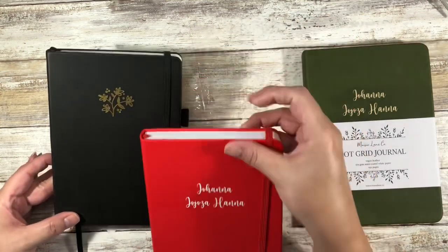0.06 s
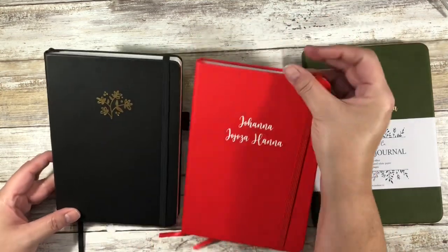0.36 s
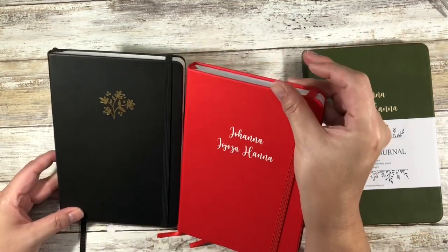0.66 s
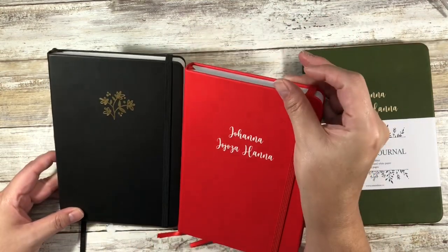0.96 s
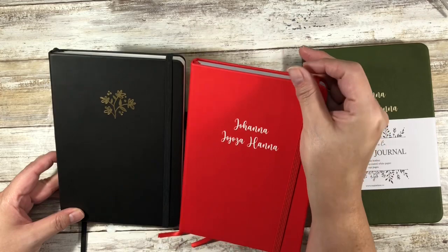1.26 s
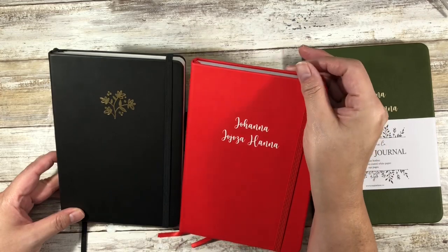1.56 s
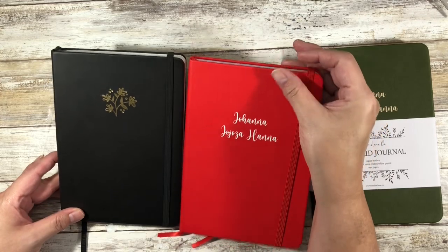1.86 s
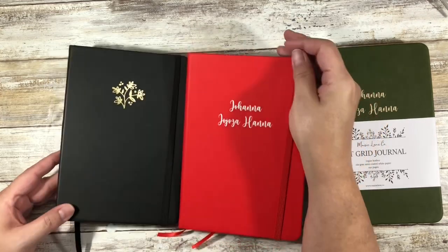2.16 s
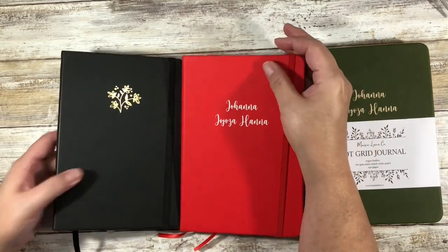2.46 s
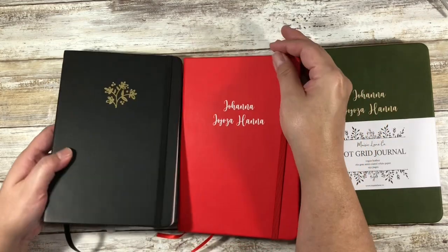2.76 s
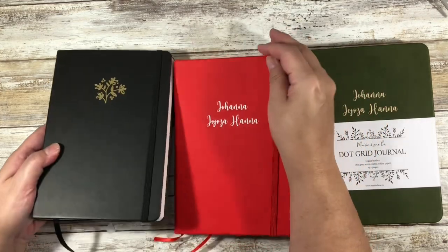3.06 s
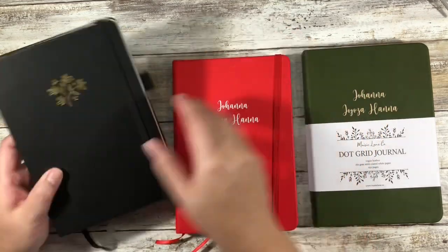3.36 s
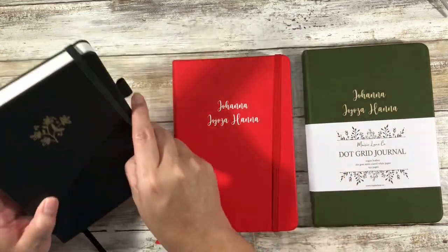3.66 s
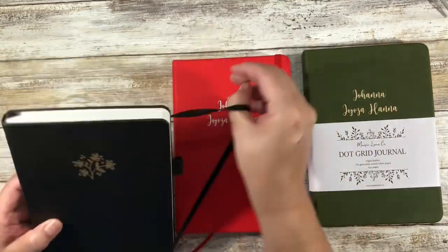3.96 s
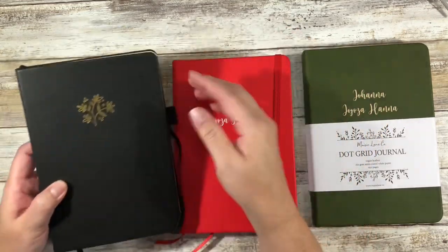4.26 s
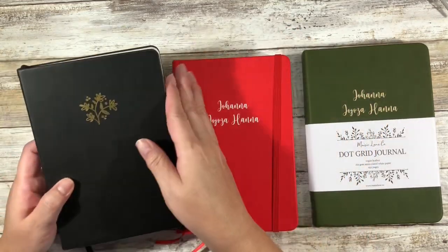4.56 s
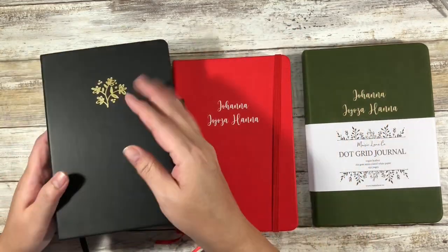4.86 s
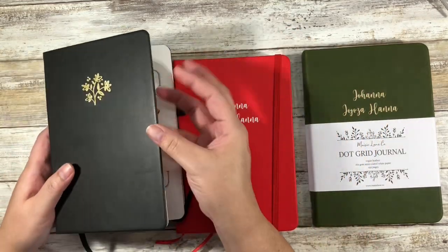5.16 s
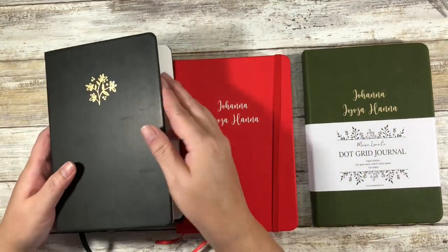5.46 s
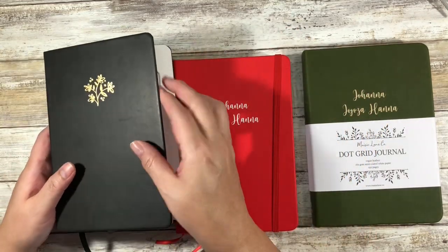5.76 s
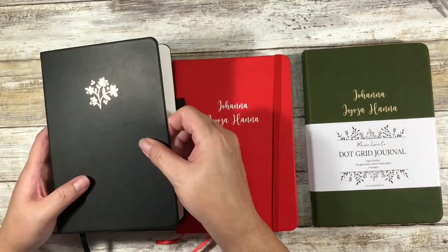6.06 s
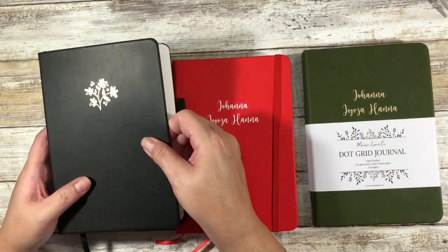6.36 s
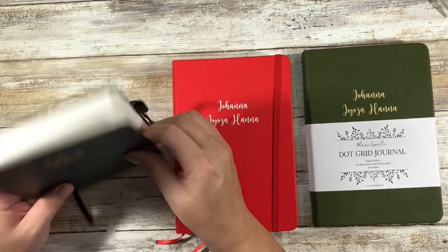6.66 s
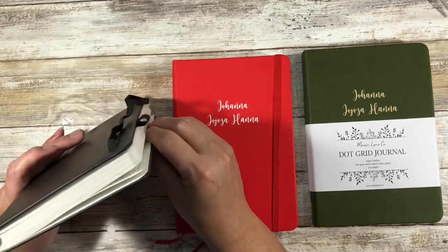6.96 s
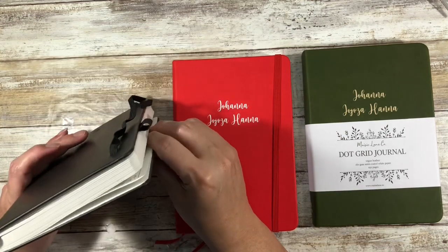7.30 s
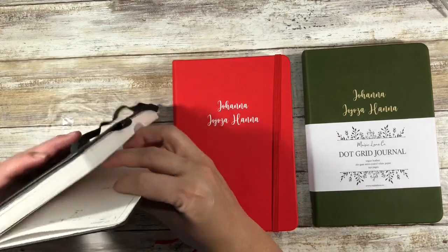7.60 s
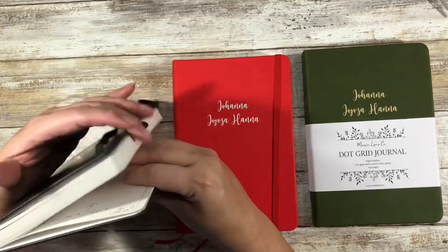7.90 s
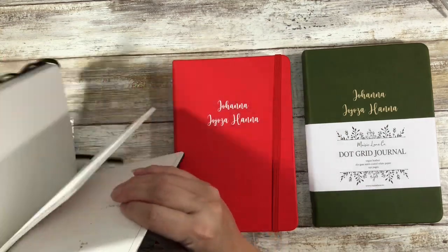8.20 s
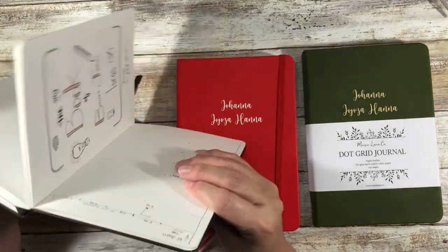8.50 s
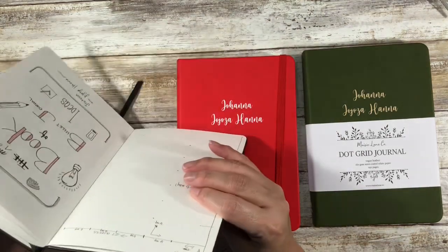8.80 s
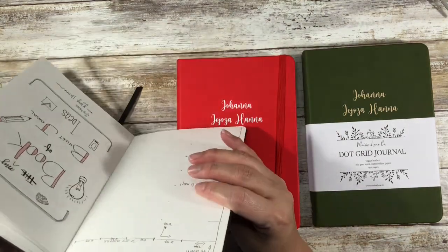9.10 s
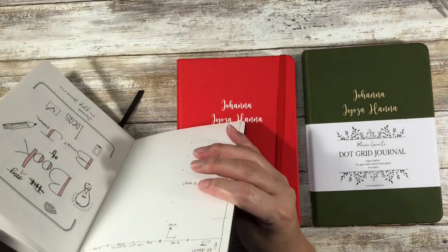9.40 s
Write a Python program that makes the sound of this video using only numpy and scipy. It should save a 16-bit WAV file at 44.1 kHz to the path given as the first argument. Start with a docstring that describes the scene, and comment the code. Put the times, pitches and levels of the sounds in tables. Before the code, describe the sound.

Hardcover notebooks are set down and nudged across a wooden table with light knocks and soft scuffs. One is lifted with a dull thump, and its elastic band comes off with a sharp snap. Fingers rub and tap the cover, then pages rustle and the book opens with a few clacks. A single microphone picks it up in a small quiet room with a faint hum.

```python
"""Light knocks and scuffs as hardcover notebooks are nudged across a wooden table; one is lifted, its
elastic snaps off, and it is opened. Knocks travel as bending waves (treble first, bass a few ms later)
and ring the table; covers, fingers and pages rub in fine stick-slip grains.
A small quiet room with a faint hum surrounds the single microphone."""
import sys
import numpy as np
from scipy import signal
from scipy.fft import rfft, irfft, next_fast_len
from scipy.io import wavfile
from scipy.ndimage import map_coordinates

SR = 44100
rng = np.random.default_rng(int(sys.argv[2]) if len(sys.argv) > 2 else 0)


def output_pcm(signal):
    """Save a mono or channel-first signal as 16-bit PCM at the path in sys.argv[1].

    Samples are clipped to [-1, 1] before scaling.
    """
    pcm = np.clip(np.atleast_2d(signal).T, -1, 1) * 32767
    wavfile.write(sys.argv[1], SR, np.round(pcm).astype(np.int16))


N = 420713


def undb(db):
    """Decibels to gain."""
    return 10 ** (np.asarray(db) / 20)


def unit(x):
    """Scale to rms 1."""
    return x / np.sqrt(np.mean(x ** 2) + 1e-18)


def band_unit(x, lo_hz, hi_hz):
    """Scale x so that its share within a band has rms 1."""
    band = signal.butter(4, [lo_hz, hi_hz], "band", fs=SR, output="sos")
    return x / np.std(signal.sosfilt(band, x))


def clock(seconds):
    """Sample times of a short sound."""
    return np.arange(max(int(seconds * SR), 16)) / SR


def add(out, start, x):
    """Mix x into out from a start in seconds."""
    i = int(np.clip(start * SR, 0, N - 1))
    out[i:i + len(x)] += x[:N - i]


def resonate(x, hz, width_hz):
    """Two-pole resonance with gain 1 at its centre."""
    w = 2 * np.pi * min(hz, .45 * SR) / SR
    a = np.sin(w) * width_hz / hz / 2
    return signal.lfilter([a, 0, -a], [1 + a, -2 * np.cos(w), 1 - a], x)


def colour(x, points):
    """Equalise x along a curve of (Hz, dB) points."""
    size = next_fast_len(N)
    hz, db = np.transpose(points)
    f = np.maximum(np.fft.rfftfreq(size, 1 / SR), 1)
    gain = undb(np.interp(np.log(f), np.log(hz), db))
    return irfft(rfft(x, size) * gain, size)[:N]


def wander(rate):
    """Glide through `rate` random values a second, with a spread near 1."""
    steps = rng.standard_normal(N // 10)
    return np.interp(np.arange(N) / SR * rate, np.arange(len(steps)), steps)


def room_tone(hum_hz=120.6, hum_db=-57, hum_waver=0.72):
    """A bed of low room air and microphone hiss, with a wavering mains hum."""
    # Spectrum of the air and hiss. Each row: frequency in Hz, density in dB per Hz.
    air_curve = [(15, -110), (35, -85), (55, -75), (90, -72.5), (140, -80.5), (270, -78), (400, -83.5),
                 (500, -90.5), (640, -88), (800, -93), (1500, -100), (3000, -104), (7000, -109),
                 (15000, -112)]
    air = colour(rng.standard_normal(N) * np.sqrt(SR / 2), air_curve)
    waver = 1 + hum_waver * (wander(28) + 1j * wander(33))  # in level and phase
    hum = np.real(waver * np.exp(2j * np.pi * hum_hz * np.arange(N) / SR))
    return air + undb(hum_db) * unit(hum)


def room_reverb(x, split_hz=1500, build_s=0.0016):
    """The small room answers with a short diffuse tail whose treble dies sooner."""
    t = clock(.5)
    noise = rng.standard_normal(len(t)) * (1 - np.exp(-(t / build_s) ** 2))
    tail = 0
    for side, db, t60_s in ("low", -10.5, 0.18), ("high", -13, 0.16):
        band = signal.sosfilt(signal.butter(1, split_hz, side, fs=SR, output="sos"), noise)
        fade = np.exp(-np.log(1000) * t / t60_s)
        tail = tail + undb(db) * band * fade / np.linalg.norm(fade)
    return signal.fftconvolve(x, tail)[:N]


def table_ring(hits, ring_db=-50.5):
    """The table top and the covers lying on it ring on after every hit."""
    # Their modes. Each row: frequency in Hz, relative level in dB, time to fall 60 dB in seconds.
    modes = [(65.4, 2, 0.19), (116.1, 6, 0.28), (186, -17, 0.35), (272, -0.5, 0.057), (325, -12, 0.058),
             (398, 3, 0.053), (496, -13, 0.26), (620, -31, .1), (872, 1, 0.045), (940, -16, 0.07),
             (1200, -4, 0.045), (1570, -6, 0.14)]
    t = clock(0.38)
    ring = sum(undb(db) * np.cos(2 * np.pi * hz * t) * np.exp(-np.log(1000) * t / t60_s)
               for hz, db, t60_s in modes)
    return undb(ring_db) * signal.fftconvolve(hits, ring)[:N]


def paper_ring(x):
    """Stiff covers and paper add narrow treble resonances to ticks and rubbing."""
    # Those resonances. Each row: centre in Hz, width in Hz, gain in dB.
    sheet_modes = [(3895, 250, -10.5), (6250, 110, -30.5), (7550, 140, -12.5), (7870, 130, -11),
                   (13000, 93, 2), (13500, 180, -12)]
    return sum(undb(db) * resonate(x, hz, width_hz) for hz, width_hz, db in sheet_modes)


def hand_reflections(x, gaps_ms=(.55, 1.3, 2.9), drift=0.13, bounce=.2):
    """Reflections between the moving hands and the covers cut wandering peaks and dips."""
    lags = (gap * SR / 1000 * (1 + drift * wander(4)) for gap in gaps_ms)
    echoes = sum(map_coordinates(x, [np.arange(N) - lag], order=3) for lag in lags)
    return (x - bounce * echoes) / np.sqrt(1 + len(gaps_ms) * bounce ** 2)


def friction(rate, patchy_db):
    """Tiny slips of uneven size, about `rate` a second, bunched as the grip comes and goes."""
    slips = (rng.random(N) < rate / SR) * rng.standard_normal(N)
    return unit(slips * undb(patchy_db * wander(120)))


def slides(attack_s=0.027, release_s=0.012, scrape_trim_db=-1, hiss_trim_db=-0.5, grip_db=1):
    """Board scrapes on wood grain, smooth covers and paper hiss, and catching fibres crackle."""
    # A cover, palm or page slides. Each row: start and length in seconds, scrape level (2.3-6 kHz)
    # and hiss level (7-15.5 kHz) in dB before the trims, swell from start to end in dB.
    moves = [(0.023, 0.14, -65, -62, -10), (0.173, 0.29, -60, -60.5, -13), (.72, 0.15, -74, -69.5, -10),
             (1.142, 0.16, -78, -73, 7), (1.602, 0.31, -69, -67.5, -1), (1.862, 0.34, -55, -61, -5),
             (2.204, 0.209, -62, -56.5, -2), (2.414, 0.17, -58.5, -58.5, -8),
             (2.57, 0.084, -58.5, -53.5, 2), (2.655, .18, -58, -60, -5.5), (2.86, .3, -56.5, -58.5, 16.5),
             (3.147, 0.32, -66.5, -67.5, -1), (3.496, 0.058, -55, -64.5, 6), (3.55, 0.18, -71, -68, 7),
             (3.682, 0.024, -55.5, -63, 0), (3.736, 0.11, -53.5, -51, -10), (4.077, 0.036, -63, -51.5, 6),
             (4.122, 0.035, -57.5, -65, -1), (4.322, 0.027, -47, -46.5, -5), (4.586, 0.15, -62.5, -68, 12),
             (4.74, 0.37, -62, -64.5, 6), (5.045, 0.046, -51.5, -58, 11), (5.117, 0.091, -52, -48, 1.5),
             (5.189, 0.23, -70.5, -65.5, -3), (5.657, 0.1, -63, -71, 1), (5.798, 0.11, -59.5, -57.5, -3),
             (5.92, 0.35, -67, -72, -17), (6.322, 0.26, -65, -65, 4), (6.57, 0.2, -67, -65.5, 2),
             (7.275, 0.1, -56.5, -57, 10), (7.397, 0.15, -55, -53.5, -6), (7.546, 0.19, -57.5, -63.5, -12),
             (7.742, 0.13, -58.5, -54, -11), (7.883, 0.064, -61, -72, 6), (7.955, 0.28, -54.5, -54.5, 0),
             (8.227, 0.18, -57.5, -57, 2), (8.383, 0.13, -59, -63, -11), (8.974, 0.29, -68, -89, -5)]
    # Tone of the rough scrape. Each row: frequency in Hz, relative level in dB.
    scrape_curve = [(150, 7.5), (400, 9.5), (900, 9), (1800, 8), (3000, 6.5), (4500, 5), (6500, -1.5),
                    (10000, -34), (16000, -34)]
    # Tone of the smooth hiss. Each row: frequency in Hz, relative level in dB.
    hiss_curve = [(2000, -24), (4500, -2), (7000, 2), (9000, 2.5), (11500, 0.5), (14000, 1), (16000, 4)]
    scrape_gain, hiss_gain = np.zeros(N), np.zeros(N)
    for start, length, scrape_db, hiss_db, swell_db in moves:
        t = clock(length + 10 * release_s)
        attack = np.minimum(t / attack_s, 1)
        swell = undb(swell_db * (np.minimum(t / length, 1) - .5))
        release = np.exp(-np.maximum(t - length, 0) / release_s)
        motion = attack * swell * release
        add(scrape_gain, start, undb(scrape_db + scrape_trim_db) * motion)
        add(hiss_gain, start, undb(hiss_db + hiss_trim_db) * motion)
    crackle = undb(-14) * friction(rate=120, patchy_db=5)
    scrape = colour(friction(rate=9000, patchy_db=3.5) + crackle, scrape_curve)
    hiss = colour(friction(rate=25000, patchy_db=1.2) + crackle, hiss_curve)
    grip = undb(grip_db * wander(30))
    return grip * (scrape_gain * band_unit(scrape, 2300, 6000) + hiss_gain * band_unit(hiss, 7000, 15500))


def strokes(fade_share=0.46, widen=1.15, sag_octaves_per_s=0.399):
    """Stick-slip grains ring the cover; each stroke swells, sags in pitch as it slows, and lets go."""
    # Skin or board catches and slips. Each row: start and length in seconds, level in dB,
    # resonance in Hz, its width in Hz before widening.
    rubs = [(0.24, 0.039, -55, 2270, 900), (1.883, .28, -58.5, 2930, 170), (1.909, 0.35, -60, 890, 990),
            (2.237, 0.097, -57, 4150, 1700), (2.501, 0.089, -48.5, 830, 447),
            (2.603, 0.076, -56.5, 900, 700), (2.675, 0.084, -51.5, 1140, 610),
            (2.748, .125, -57, 1470, 400), (2.886, 0.25, -52.5, 590, 900), (3.098, 0.037, -46, 1390, 450),
            (3.504, .064, -46.5, 404, 450), (3.755, 0.071, -49.5, 724, 900), (3.853, 0.026, -31, 770, 403),
            (4.628, 0.16, -54.5, 1230, 1000), (5.046, .044, -41, 1270, 382),
            (5.071, 0.032, -49, 2440, 1100), (5.191, 0.013, -42, 1560, 1300),
            (5.196, 0.023, -46.5, 7000, 1500), (5.769, 0.2, -57.5, 1690, 1400),
            (5.941, 0.092, -49.5, 1690, 600), (5.979, 0.089, -49.5, 1210, 890),
            (6.08, 0.146, -46.5, 1360, 980), (6.216, 0.026, -49.5, 1200, 704),
            (6.328, 0.16, -50, 1410, 735), (6.415, 0.13, -53.5, 2530, 500), (6.46, 0.18, -58, 1350, 1100),
            (7.288, 0.11, -56, 2130, 400), (7.57, 0.026, -36.5, 1500, 387), (7.571, 0.029, -46.5, 735, 600),
            (7.715, 0.057, -51, 1730, 450), (7.759, 0.1, -56, 1810, 1200), (8.113, 0.033, -47, 1720, 1400),
            (8.189, 0.024, -51, 1260, 1200)]
    out, slips = np.zeros(N), friction(rate=3500, patchy_db=2.5)
    for start, length, db, hz, width_hz in rubs:
        t = clock(length)
        grains = slips[int(start * SR):][:len(t)]
        ring = resonate(resonate(grains, hz, widen * width_hz), hz, widen * width_hz)
        speed = 2 ** (sag_octaves_per_s * (length / 2 - t))
        sagging = map_coordinates(ring, [np.cumsum(speed)], order=3)
        fades = signal.windows.tukey(len(sagging), fade_share)
        add(out, start, undb(db) * unit(sagging * fades))
    return out


def ticks(crest_db=6):
    """Elastic, nails and paper crack in bright bursts of noise that die within milliseconds."""
    # The cracks. Each row: start in seconds, nominal peak in dB (crest_db above the opening rms),
    # centre in Hz, decay in ms.
    cracks = [(.0224, -46, 3000, 5.9), (0.1894, -40.5, 3370, 4.3), (1.895, -33.5, 3500, 5.3),
              (3.077, -26, 5300, 2.3), (3.1263, -31.5, 6860, 3.3), (3.406, -45, 3500, 1.5),
              (3.7474, -28.5, 9000, 2.9), (3.7615, -31, 5000, 3.2), (3.803, -42, 3000, 3.5),
              (3.8541, -10, 12300, 2.9), (3.858, -21, 13400, 1.6), (3.8603, -12, 6500, 4.1),
              (3.868, -36, 4900, 26), (4.816, -41, 5000, 2.5), (4.8636, -40.5, 8000, 2),
              (5.0078, -35, 9000, 1.4), (6.596, -46.5, 4000, 8.6), (6.968, -44, 5150, 4),
              (7.3647, -34.5, 9000, 2.4), (7.6792, -37, 7000, 2.5), (8.068, -22, 9900, 0.51),
              (8.0714, -23.5, 8540, 1.1), (8.1134, -34, 6000, 1.5), (8.125, -21, 3880, 1.6),
              (8.174, -22.5, 5270, 1.6), (8.266, -36, 4000, 3), (8.3064, -41, 5000, 2.2),
              (8.6076, -26.5, 7500, 1), (8.807, -47, 7220, 2), (8.8878, -43, 3870, 2.6)]
    out, t = np.zeros(N), clock(.1)
    for start, db, hz, decay_ms in cracks:
        burst = unit(resonate(rng.standard_normal(len(t)), hz, width_hz=hz))
        fade = np.exp(-1000 * t / decay_ms)
        add(out, start, undb(db - crest_db) * burst * fade)
    return out


def thuds(lead_s=.02, echo_s=0.0154, echo_db=-15):
    """One swing of pressure as a broad face lands, thrown back once by a wall."""
    # The flat of a book or hand lands. Each row: time in seconds, peak in dB, pitch in Hz.
    landings = [(0.041, -40.5, 90), (0.078, -39, 90), (2.165, -45, 59.5), (3.143, -19, 84),
                (3.872, -37.5, 104), (4.898, -38.5, 122), (7.388, -30.5, 71), (8.421, -46, 64)]
    out = np.zeros(N)
    for time, db, hz in landings:
        phase = 2 * np.pi * hz * (clock(2 * lead_s) - lead_s)
        swing = -undb(db) * phase * np.exp((1 - phase ** 2) / 2)
        add(out, time - lead_s, swing)
        add(out, time - lead_s + echo_s, undb(echo_db) * swing)
    return out


def bending_wave(db, hz, octaves, delay_ms, noise, damping=0.76, scatter_db=-7, scatter_s=0.0077):
    """A short push, smeared because low bending waves travel slower, then scattered by the edges."""
    size = len(noise)
    f, t = np.fft.rfftfreq(size, 1 / SR), np.arange(size) / SR
    # A small board radiates little bass; a soft contact gives little treble.
    lo, hi = 1j * f / hz * 2 ** (octaves / 2), 1j * f / hz / 2 ** (octaves / 2)
    push = lo ** 2 / (1 + damping * lo + lo ** 2) / (1 + damping * hi + hi ** 2)
    # delay_ms is the travel time at 1 kHz; only the lag behind the fastest treble is heard.
    slowest_hz, shear_hz = 170, 2800  # wave speed is constant outside this range
    slowness = np.sqrt(1000 / np.clip(f, slowest_hz, shear_hz)) - np.sqrt(1000 / shear_hz)
    phase = 2 * np.pi * np.cumsum(slowness * delay_ms / 1000) * f[1]
    wave = push * np.exp(-1j * phase)
    # Edge reflections give each spot its own uneven resonances, mostly above the bass.
    edges = noise * np.exp(-t / scatter_s)
    scatter = 1 + undb(scatter_db) * rfft(edges) / np.linalg.norm(edges) * f / (f + 350)
    return undb(db) * irfft(wave * scatter)[:size // 2] / np.abs(irfft(wave)).max()


def light_knocks(delay_ms=3.26):
    """A finger or book edge knocks and sends out one bending wave."""
    # The knocks. Each row: start in seconds, peak in dB before scatter, pitch in Hz, breadth in octaves.
    taps = [(0.021, -30.5, 1050, 2.95), (0.193, -41.5, 470, 0.91), (2.132, -35, 360, .2),
            (2.41, -41, 780, 0.37), (2.477, -30.5, 338, 1.2), (2.5751, -29, 860, .1),
            (2.803, -38.5, 746, 0.76), (3.1196, -18, 1080, .1), (3.593, -43, 1060, .8),
            (3.798, -28.5, 1500, 2), (4.134, -39, 510, 0.87), (4.146, -43, 1020, 1.7),
            (4.23, -38.5, 370, .1), (4.308, -42, 320, .1), (4.334, -37, 418, 0.94), (4.814, -27, 950, 0.36),
            (4.866, -30.5, 397, 2.2), (4.8935, -34.5, 470, .5), (7.325, -32.5, 616, 2.3),
            (7.404, -38.5, 1270, 0.42), (7.4324, -35.5, 1150, 0.43), (7.680, -39, 490, 3.3),
            (8.1143, -20, 970, 2.1), (8.6066, -22.5, 1000, 2.6), (8.615, -29, 510, .2),
            (8.644, -26.5, 530, .2), (8.8068, -37.5, 1460, 1.56), (9.125, -47, 1400, 1.5),
            (9.257, -47, 1500, 1.2)]
    out = np.zeros(N)
    for start, db, hz, octaves in taps:
        add(out, start, bending_wave(db, hz, octaves, delay_ms, rng.standard_normal(4096)))
    return out


def book_blows(clack_hz=1190, clack_octaves=0.85, thump_octaves=0.89):
    """A whole book is struck: its cover clacks, then its block of pages thumps."""
    # The blows. Each row: start in seconds, clack and thump peaks in dB before scatter,
    # thump pitch in Hz, thump lag in ms, bending-wave travel time at 1 kHz in ms.
    blows = [(0.2312, -27.5, -26.5, 272, 2.7, 2.36), (3.1245, -25, -18, 266, 0.65, 3.8),
             (3.4062, -36, -20, 263, 1.5, 2.3), (3.8612, -13.5, -18.5, 330, 1.05, 1.43),
             (8.6283, -24, -18, 314, 0.31, 2.6)]
    out = np.zeros(N)
    for start, clack_db, thump_db, thump_hz, lag_ms, delay_ms in blows:
        spot = rng.standard_normal(4096)  # both waves share the same edge reflections
        add(out, start, bending_wave(clack_db, clack_hz, clack_octaves, delay_ms, spot))
        add(out, start + lag_ms / 1000, bending_wave(thump_db, thump_hz, thump_octaves, delay_ms, spot))
    return out


def scene():
    """Knocks, thuds and rubbing on the ringing table, heard in the room in mono."""
    knocks = light_knocks() + book_blows()
    landings = thuds()
    surface = ticks() + hand_reflections(strokes() + slides())
    close = knocks + surface + paper_ring(surface) + table_ring(knocks + landings)
    return (close + landings + room_reverb(close) + room_tone())[None]


def record(dry, rumble_hz=30, top_hz=15900):
    """The recorder rolls off rumble and cuts the very top steeply."""
    low_cut = signal.butter(2, rumble_hz, "high", fs=SR, output="sos")
    high_cut = signal.ellip(10, .2, 70, top_hz, fs=SR, output="sos")
    return signal.sosfilt(high_cut, signal.sosfilt(low_cut, dry))


dry = scene()
out = record(dry)
output_pcm(out)
```